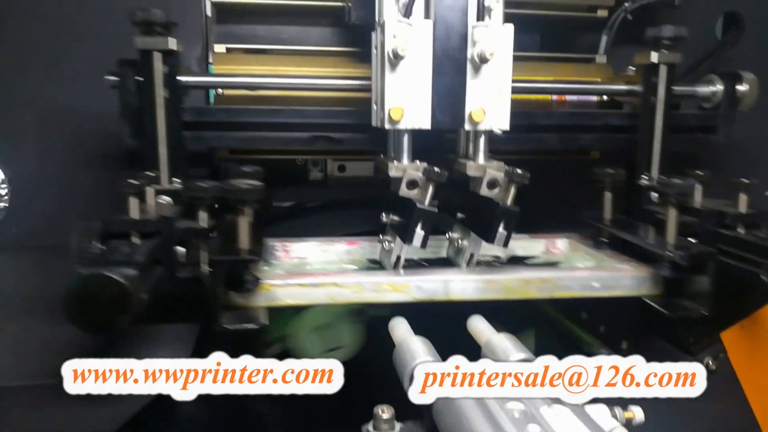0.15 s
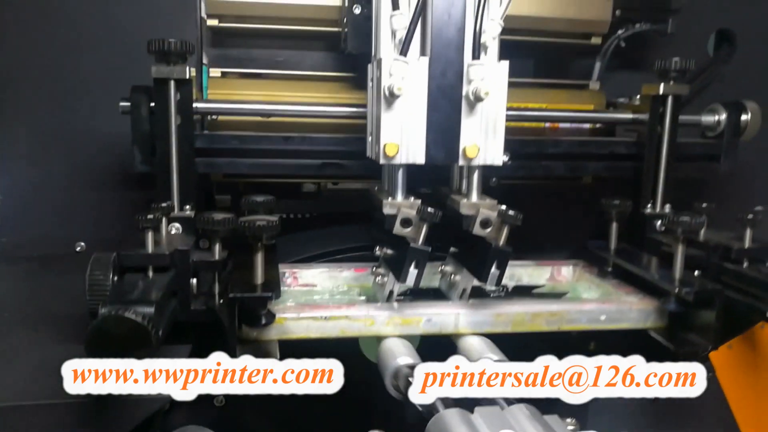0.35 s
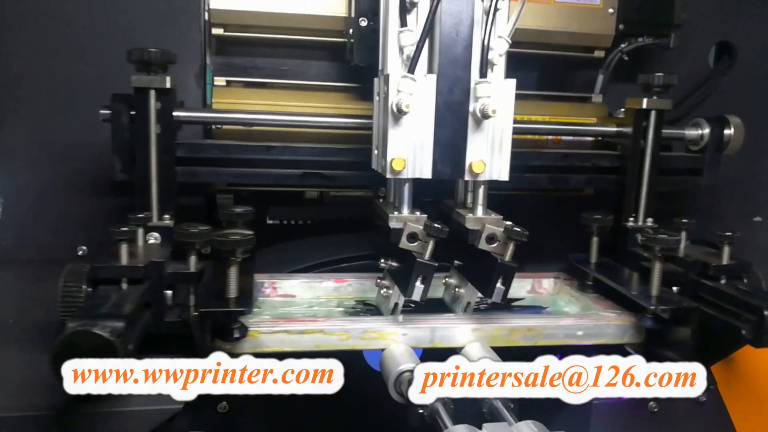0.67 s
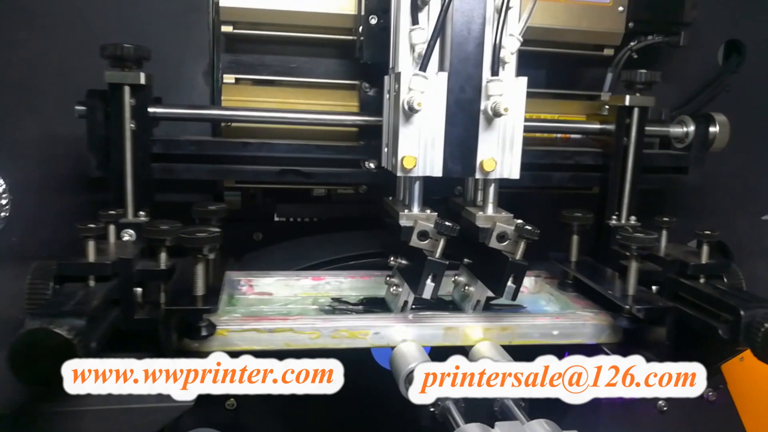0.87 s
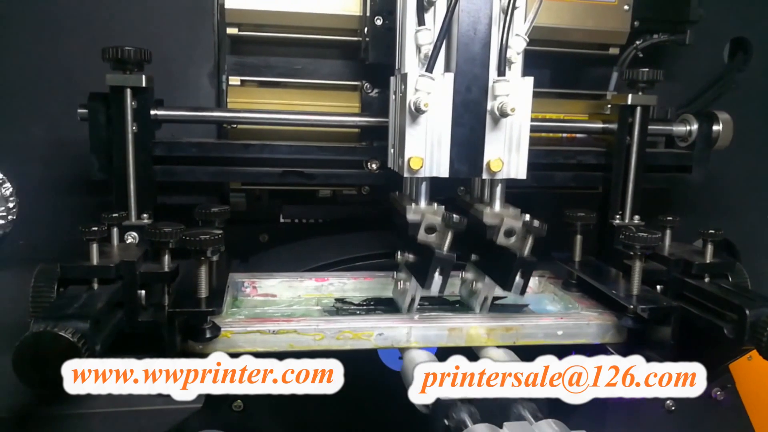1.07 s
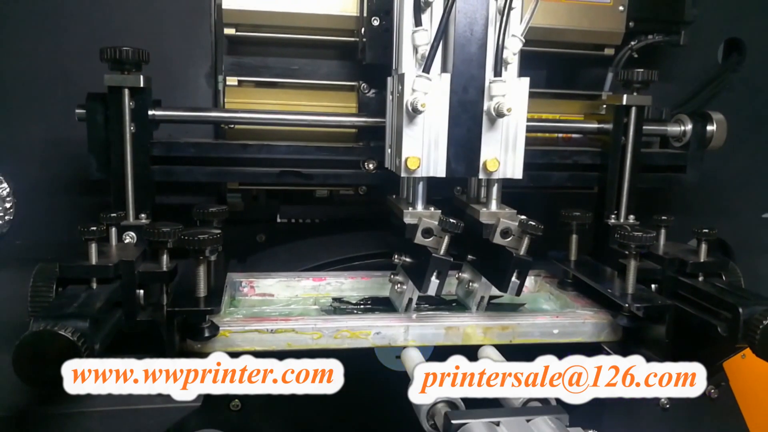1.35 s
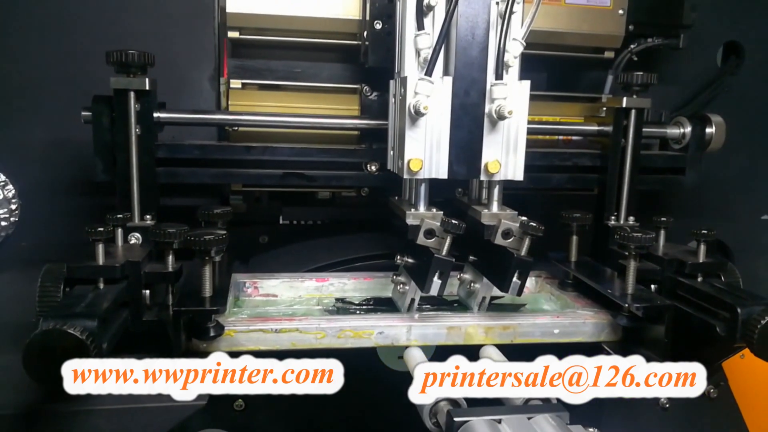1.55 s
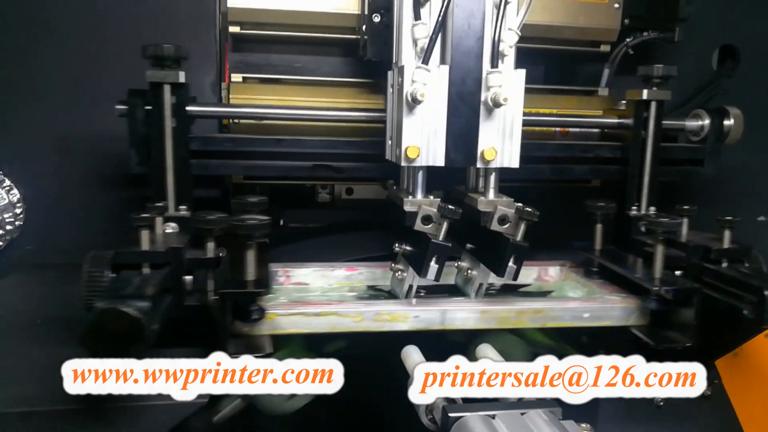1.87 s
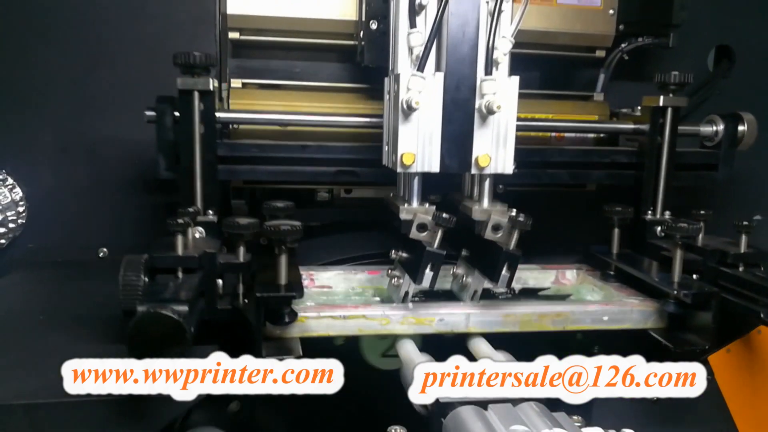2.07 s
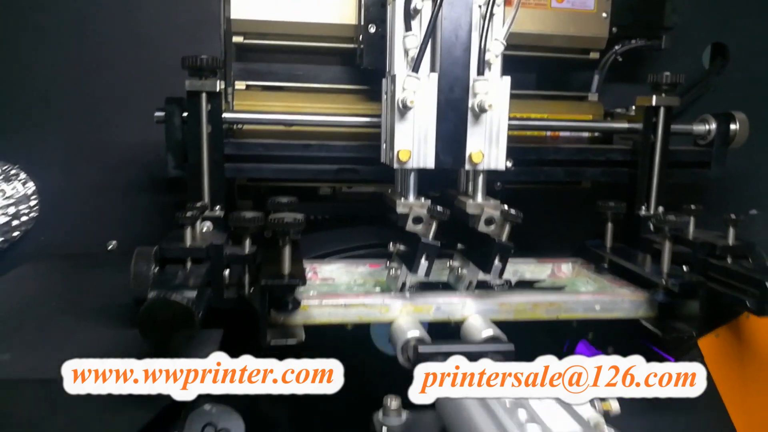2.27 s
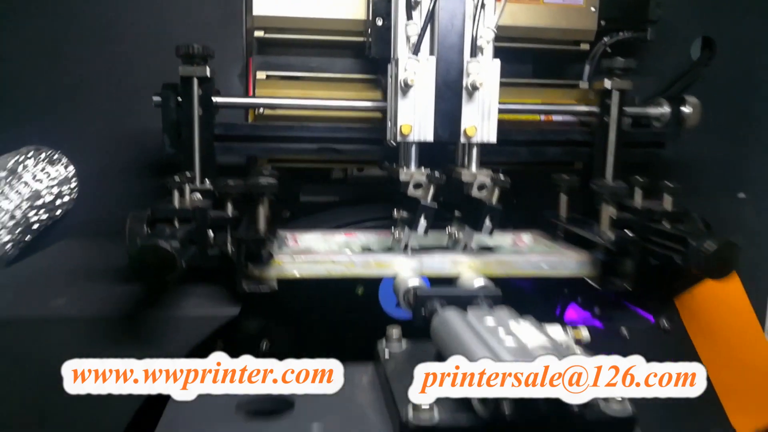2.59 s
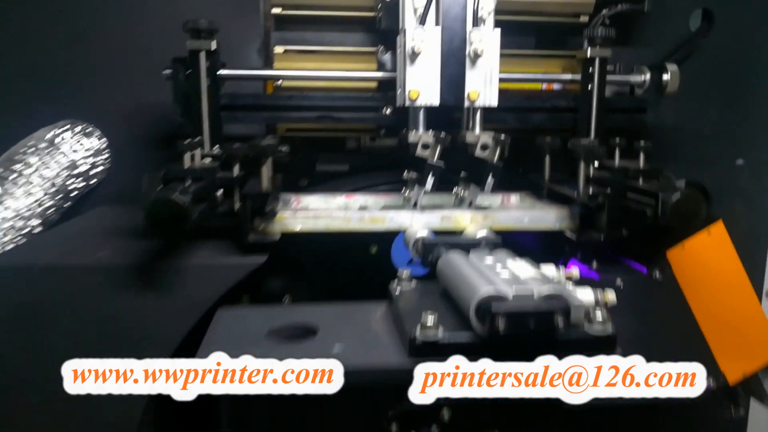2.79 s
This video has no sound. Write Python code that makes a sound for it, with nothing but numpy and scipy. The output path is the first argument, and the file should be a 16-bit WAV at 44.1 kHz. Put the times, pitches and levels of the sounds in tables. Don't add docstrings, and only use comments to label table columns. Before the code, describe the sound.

Close pneumatic printing machine hissing and humming, its table thudding and clamps knocking in a rhythmic cycle

```python
import sys
import numpy as np
from scipy import signal
from scipy.fft import rfft, irfft
from scipy.io import wavfile
from scipy.ndimage import uniform_filter1d

SR = 44100
rng = np.random.default_rng(int(sys.argv[2]) if len(sys.argv) > 2 else 0)


def ratio(d):
    e = np.asarray(d, float) / 20
    return 10 ** e


def wav_record(signal):
    frames = np.transpose(np.atleast_2d(signal))
    bounded = np.clip(frames, -1, 1)
    quanta = np.round(bounded * 32767).astype(np.int16)
    wavfile.write(sys.argv[1], SR, quanta)


N = 129213
T = np.arange(N) / SR

# time in seconds, level in dB.
LEAK_LEVEL = [(0, -35), (.35, -37), (.55, -35.5), (.91, -34.5), (.96, -41.5), (1.12, -38), (1.74, -37),
              (2.1, -38), (2.26, -38), (2.31, -36.5), (2.42, -35), (2.73, -34.5), (2.79, -41),
              (2.93, -35.5)]
# time in seconds, level in dB.
JET_LEVEL = [(0, -42), (.06, -55), (.515, -55), (.53, -43.5), (.86, -43), (.96, -39), (1.12, -35),
             (1.69, -35.5), (1.715, -41.5), (1.88, -44.5), (1.94, -52.5), (2.33, -52), (2.36, -42.5),
             (2.5, -41), (2.68, -45.5), (2.84, -38), (2.93, -38)]
# time in seconds, level in dB.
DRIVE_LEVEL = [(0, -47), (.4, -50), (.88, -48.5), (1.05, -40.5), (1.68, -39.5), (1.76, -49.5), (2.6, -48),
               (2.93, -39.5)]
# time in seconds, level in dB.
PUMP_LEVEL = [(0, -31), (.14, -60), (.35, -62), (.4, -46), (.62, -42.5), (.7, -57.5), (1.299, -45.5),
              (1.46, -36), (1.6, -40), (1.9, -36.5), (2.17, -42), (2.235, -30), (2.32, -55), (2.4, -35),
              (2.72, -40.5), (2.77, -44), (2.86, -33.5), (2.93, -30.5)]
# frequency in Hz, noise density in dB per Hz.
LEAK_COLOUR = [(1470, -55), (2500, -37), (2880, -14.5), (3120, -12.5), (3770, -13), (4610, -4.5),
               (6040, -2.5), (7000, -5), (8290, -12), (10800, -38), (18200, -120)]
# frequency in Hz, noise density in dB per Hz.
JET_COLOUR = [(300, -8.5), (800, -8.5), (1400, -3.5), (2000, -0.5), (3000, 0), (4000, -0.5), (6600, -1.5),
              (8300, -30.5)]
# frequency in Hz, noise density in dB per Hz.
HALL_COLOUR = [(45, -13), (70, -0.5), (125, -4.5), (200, -8.5), (290, -11), (500, -23), (900, -22),
               (2500, -25)]
# frequency in Hz, width in Hz, level in dB (plus 16: peak against the
LEAK_WHISTLES = [(5140, 36, -13.5), (5964, 51, -13), (6150, 56, -13), (6600, 190, -18.5)]
# frequency in Hz, width in Hz, level in dB (plus 16: peak against the
JET_WHISTLES = [(1806, 9.9, -13), (2380, 22, -10.5), (2677, 37, -9.5), (2890, 35, -13), (3410, 300, -15.5)]
# frequency in Hz, likeness from 0 to 1.
LIKENESS = [(60, 1), (150, 0.98), (300, 0.97), (600, 0.85), (2000, 0.85), (4000, 0.83), (7800, 1)]
# frequency in Hz, left minus right in dB.
LEAN = [(60, 4), (160, -1), (420, 1.5), (1120, 0.0), (2960, -1), (7840, -5.5)]
# start in seconds, length in seconds, dip in dB.
RESTS = [
    (0.762, 0.12, -6),
    (1.713, 0.079, -11.5),
    (2.575, 0.067, -10),
]
# start in seconds, peak in dB.
LANDINGS = [
    (-.0215, -16.5),
    (1.808, -16.5),
]
# start in seconds, level in dB, length in seconds,
# centre of the struck modes in Hz.
KNOCKS = [(.0, -39, 0.016, 387), (0.077, -45, 0.026, 268), (0.306, -42, 0.033, 450),
          (0.363, -36.5, 0.038, 500), (0.459, -42.5, 0.025, 350), (0.523, -43.5, 0.024, 272),
          (0.87, -37.5, 0.035, 495), (0.916, -48, 0.043, 420), (1.07, -37, 0.024, 220),
          (1.388, -37, 0.036, 280), (1.808, -38.5, 0.083, 300), (2.137, -44.5, .03, 394),
          (2.196, -37, 0.037, 470), (2.294, -46, 0.05, 346), (2.364, -48.5, 0.059, 280),
          (2.699, -40, 0.035, 440), (2.748, -45, 0.03, 270), (2.905, -34.5, .04, 198)]
# frequency in Hz, level in dB,
# time to die by 60 dB in seconds.
BODY_MODES = [(147, -3, 0.17), (205, -2.5, 0.13), (242, -7.5, 0.13), (277.7, -1.5, 0.099), (354, -10, 0.14),
              (420, -3.5, 0.066), (482, -7.5, 0.069), (610, -4.5, 0.037), (742, -12, 0.077),
              (938, -4, 0.065), (1300, -15, .06), (1496, -14.5, 0.08)]
# start in seconds, level in dB, length in seconds, centre in Hz,
# width in octaves.
PUFFS = [(.0, -41, 0.059, 1810, 3.8), (0.444, -41.5, 0.026, 2500, 1.3), (0.527, -41, 0.009, 3380, 0.58),
         (0.864, -41, 0.017, 1500, 0.89), (1.072, -28.5, 0.012, 4270, 0.41),
         (1.086, -29.5, 0.014, 4140, 1.7), (1.684, -36, 0.021, 5500, 0.86),
         (1.804, -45.5, 0.062, 1510, 0.72), (2.269, -38.5, 0.024, 2920, 0.35),
         (2.689, -43, 0.04, 1550, 1.15), (2.772, -41, 0.057, 3280, 0.027), (2.897, -34.5, 0.049, 3180, 1.2),
         (2.915, -36, .02, 3000, 1.8)]
# start in seconds, peak in dB, frequency in Hz,
# swell time in seconds.
PANELS = [(0.021, -36.5, 269, 0.027), (.366, -36, 427, 0.0083), (.364, -39, 597, 0.0081),
          (.378, -31.5, 291, 0.012), (.49, -39, 294, .03), (1.073, -37, 231, 0.0093),
          (1.075, -43.5, 322, 0.013), (1.1, -44, 271, .018), (1.255, -45.5, 244, .015),
          (1.53, -44.5, 370, 0.013), (1.834, -38.5, 273.7, 0.019), (2.193, -34.5, 593, 0.005),
          (2.206, -40, 420, 0.011), (2.208, -32, 289, 0.012), (2.36, -47, 289, 0.015),
          (2.7, -43.5, 522, 0.016), (2.76, -41.5, 259, 0.019), (2.78, -47, 422, 0.014),
          (2.896, -34, 185, 0.011), (2.903, -34, 264, .014), (.866, -44, 1430, 0.0096),
          (.868, -45, 1000, .012), (2.697, -47, 997, 0.0116), (2.697, -47, 1504, .012),
          (.875, -43, 277, .015), (0.879, -46.5, 450, 0.013), (.97, -46.5, 373, 0.021),
          (1.68, -45, 258, 0.015), (2.31, -39, 298, 0.012)]
# start in seconds, peak in dB, frequency in Hz,
# swell time in seconds.
PUSHES = [(0.07, -31, 126, 0.0058), (1.898, -32, 123.6, 0.0094), (.17, -34.5, 150, 0.021),
          (0.299, -33.5, 150, 0.013), (0.377, -32.5, 99.6, 0.022), (0.521, -43, 150, 0.045),
          (.93, -36.5, 145.7, 0.031), (1.0745, -32.5, 54.2, 0.01), (1.229, -29.5, 150, 0.016),
          (1.27, -35, 111, 0.015), (1.405, -36.5, 154, 0.02), (1.43, -37, 98, .015),
          (1.67, -33.5, 133, 0.0091), (2.141, -38, 150, 0.018), (2.7, -40, 150, 0.015),
          (1.99, -42.5, 150, .02), (2.09, -48, 150, 0.014), (2.272, -47, 150, 0.018),
          (2.379, -41.5, 150, .02), (2.461, -48, 150, .018), (2.635, -49.5, 150, .02),
          (2.847, -38, 155, 0.015), (.485, -42.5, 150, 0.017), (1.18, -41, 139, 0.017),
          (0.629, -40.5, 150, .025)]

HALL_DB = -44
RIPPLE_DB, RIPPLE_HZ = 2, 24.96
DRIVE_HZ, PUMP_HZ = 51.9, 98.5
THUD_HZ, THUD_SWELL_S, THUD_HOLD_S = 150, 0.012, 0.014
FRAME_TAIL_DB, FRAME_TAIL_T60_S = -11.5, 1
FIRST_BLOW, RATTLE_PER_S, KNOCK_DECAY_S = 3.15, 900, 0.025
REACH_DB_PER_OCTAVE = -4
BODY_WIDTH = 0.24
PUFF_EDGE_S, PUFF_ECHO_DB = 0.0024, -4
ECHO_DB, ECHO_T60_S = -8, 1
DROPOUT_S, DROPOUT_WIDTH_S, DROPOUT_DEPTH = 2.147, 0.007, 0.7
CUTOFF_HZ = 8270
LEFT_RIGHT = np.array([[1], [-1]])


def rms_one(x):
    return x / np.sqrt(np.mean(x ** 2) + 1e-20)


def level(rows):
    return ratio(np.interp(T, *np.transpose(rows)))


def at_hz(points, hz):
    table_hz, values = np.array(points).T
    return np.interp(np.log(hz), np.log(table_hz), values)


def drift(rate):
    r = np.exp(-80 * np.pi * rate / SR)
    noise = rng.standard_normal(N // 40 + 2002)
    slow = signal.lfilter([1], [1, -2 * r, r * r], noise)[2000:]
    return np.interp(np.arange(N) / 40, np.arange(len(slow)), rms_one(slow))


def gate(s, length, rise, fall):
    release = np.exp(-np.clip(T - s - length, 0, None) / fall)
    return np.clip((T - s) / rise, 0, 1) * release


def air(colour, whistles, patchy_db, in_step):
    hz = np.maximum(np.arange(N // 2 + 1) * SR / N, 10)
    mid, side = rfft(rng.standard_normal((2, N)))
    low, high = colour[0][0] * .7, colour[-1][0] * 1.3
    shape = ratio(at_hz(colour, hz)) * (hz > low) * (hz < high)
    ridges = sum(ratio(db + 16) ** 2 / (1 + (2 * (hz - f) / w) ** 2) for f, w, db in whistles)
    shape = shape * np.sqrt(1 + ridges)
    ripple = uniform_filter1d(rng.standard_normal(len(hz)), max(int(RIPPLE_HZ * N / SR), 1))
    shape = shape * ratio(RIPPLE_DB * rms_one(ripple))
    alike = np.clip(at_hz(LIKENESS, hz), 0, 1)
    pair = np.sqrt(1 + alike) * mid + LEFT_RIGHT * np.sqrt(1 - alike) * side
    full = shape * ratio(LEFT_RIGHT * at_hz(LEAN, hz) / 2) * pair
    out, together = 0, drift(8.4)
    place = 2 * np.log2(hz)
    for k in range(int(2 * np.log2(low)), int(2 * np.log2(high)) + 2):
        band = irfft(full * np.clip(1 - abs(place - k), 0, 1), N)
        out = out + band * ratio(patchy_db * (in_step * together + drift(21.4)))
    return rms_one(out)


def leak():
    return ratio(1.0) * level(LEAK_LEVEL) * air(LEAK_COLOUR, LEAK_WHISTLES, patchy_db=1.22, in_step=0.18)


def jet():
    return ratio(3.5) * level(JET_LEVEL) * air(JET_COLOUR, JET_WHISTLES, patchy_db=1.33, in_step=0.8)


def hall_noise(rest_db):
    return ratio(HALL_DB + rest_db) * air(HALL_COLOUR, [], patchy_db=2.5, in_step=0.24)


def hum(hz, rows, rough):
    phase = 2 * np.pi * hz * T + .4 * drift(2.0)
    return np.sqrt(2) * level(rows) * (1 + rough * drift(21.0)) * np.sin(phase)


def motors():
    return hum(DRIVE_HZ, DRIVE_LEVEL, rough=0.12) + hum(PUMP_HZ, PUMP_LEVEL, rough=0.25)


def swell(s, db, hz, rise, tail_db, hold=0):
    t = np.clip(T - s, 0, None)
    age = (np.minimum(t, rise) + np.clip(t - rise - hold, 0, None)) / rise
    tail = ratio(tail_db - 60 * t / FRAME_TAIL_T60_S) * (1 - np.exp(-t / rise))
    return -ratio(db) * (age * np.exp(1 - age) + tail) * np.sin(2 * np.pi * hz * t)


def landings():
    return sum(swell(s, db, THUD_HZ, THUD_SWELL_S, FRAME_TAIL_DB, hold=THUD_HOLD_S)
               for s, db in LANDINGS)


def ring(x, hz, t60):
    r, w = ratio(-60 / (t60 * SR)), 2 * np.pi * hz / SR
    return signal.lfilter([0, np.sin(w)], [1, -2 * r * np.cos(w), r * r], x + 1e-18)


def knocks():
    contacts = (rng.random((2, N)) < RATTLE_PER_S / SR) * rng.standard_normal((2, N))
    chance_db = rng.normal(0, 1.1, (len(KNOCKS), len(BODY_MODES)))
    first = np.zeros(N)
    first[[int((row[0] + .001) * SR) + 1 for row in KNOCKS]] = FIRST_BLOW
    out = 0
    for m, (hz, mode_db, t60) in enumerate(BODY_MODES):
        drive = 0
        for k, (s, db, length, near) in enumerate(KNOCKS):
            reach_db = REACH_DB_PER_OCTAVE * np.log2(hz / near) ** 2
            gain = ratio(db + mode_db + reach_db + chance_db[k, m] - 9.0)
            drive = drive + gain * gate(s, length * min(380 / hz, 1), .001, KNOCK_DECAY_S)
        rattle = np.roll(contacts, 997 * m, axis=1) * min(hz / 250, 1) ** 2
        mid, side = ring((rattle + first * (-1) ** m) * drive, hz, t60)
        out = out + mid + BODY_WIDTH * min(hz / 400, 1) ** 2 * side * LEFT_RIGHT
    return out


def puffs():
    out = 0
    for s, db, length, hz, octaves in PUFFS:
        edges = hz * 2 ** (np.array([-.5, .5]) * max(octaves, .03))
        edges = np.minimum(edges, [9000, 10000])
        band = signal.butter(2, edges, "band", fs=SR, output="sos")
        mid, side = rms_one(signal.sosfilt(band, rng.standard_normal((2, N))))
        pair = (mid + 0.22 * side * LEFT_RIGHT) * ratio(LEFT_RIGHT * .5 * at_hz(LEAN, hz))
        out = out + ratio(db) * gate(s, length, PUFF_EDGE_S, PUFF_EDGE_S * 0.5) * pair
    return out


def hall_echo(x):
    mid, side = rng.standard_normal((2, SR)) * ratio(-60 * T[:SR] / ECHO_T60_S)
    tail = (mid + 0.19 * side * LEFT_RIGHT) / np.sqrt(np.sum(mid ** 2))
    return ratio(ECHO_DB) * signal.fftconvolve(x.mean(axis=0, keepdims=True), tail)[:, :N]


def panels():
    return sum(swell(*row, tail_db=-33) for row in PANELS)


def pushes():
    return sum(swell(*row, tail_db=-18) for row in PUSHES)


def scene():
    rest_db = sum(db * gate(s, length, 0.014, .003) for s, length, db in RESTS)
    steady = leak() + jet() + hall_noise(rest_db) + motors()
    hits, valves = knocks(), puffs()
    echo = ratio(rest_db) * hall_echo(hits + ratio(PUFF_ECHO_DB) * valves)
    return steady + landings() + hits + valves + echo + panels() + pushes()


def top_cut(x):
    return signal.sosfilt(signal.butter(12, 8440, fs=SR, output="sos"), x)


def record(dry):
    dip = 1 - DROPOUT_DEPTH * np.exp(-((T - DROPOUT_S) / DROPOUT_WIDTH_S) ** 2)
    steep = signal.ellip(12, .2, 45, CUTOFF_HZ, fs=SR, output="sos")
    mix = signal.sosfiltfilt(steep, dry * dip)
    return top_cut(mix)


dry = scene()
out = record(dry)
wav_record(out)
```